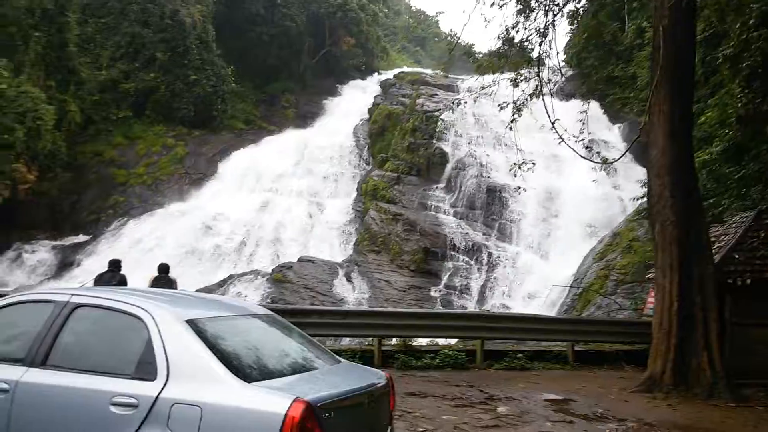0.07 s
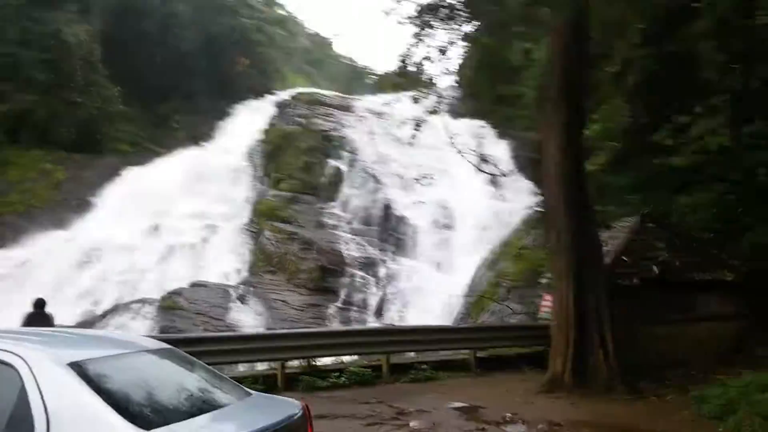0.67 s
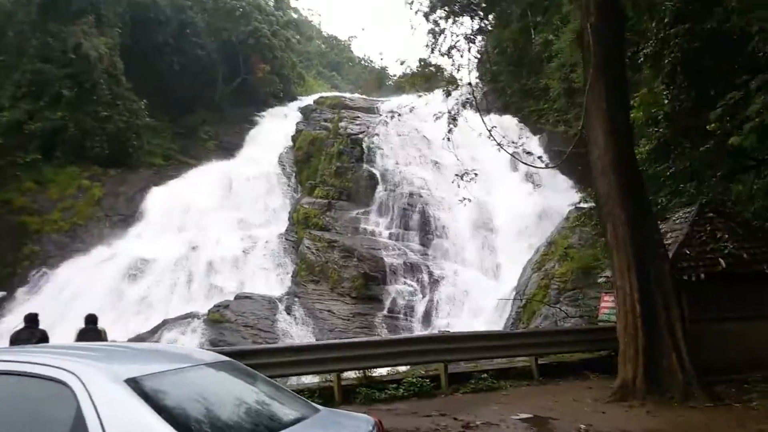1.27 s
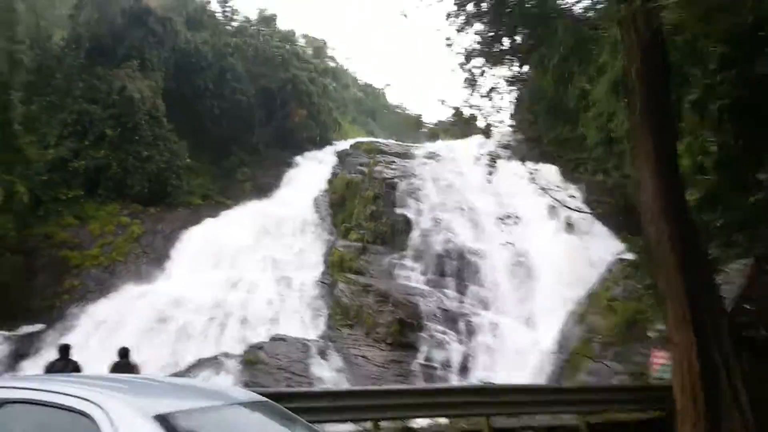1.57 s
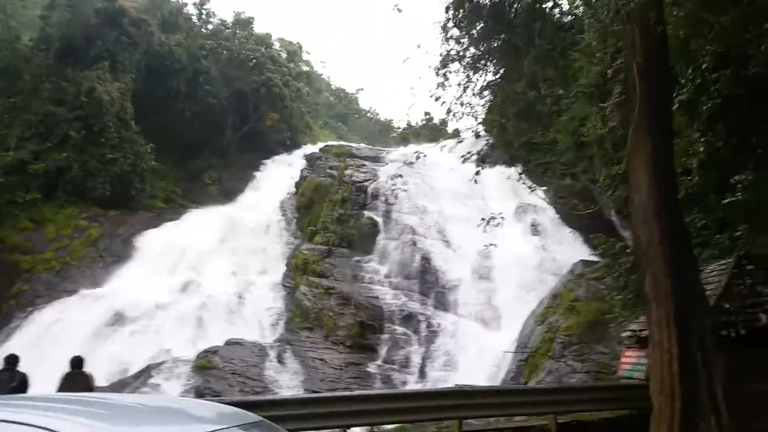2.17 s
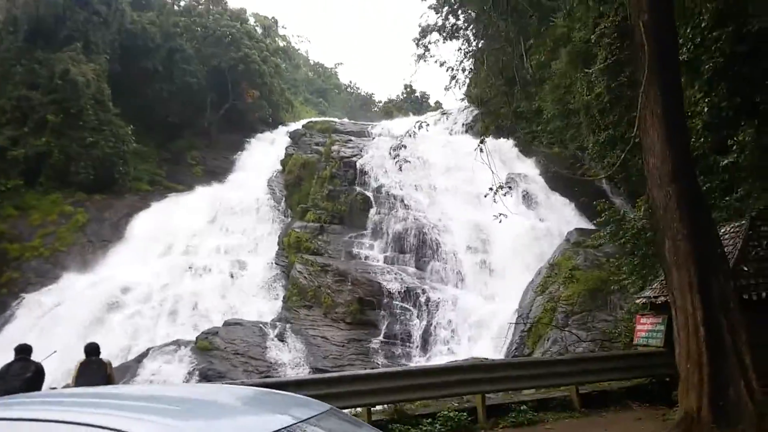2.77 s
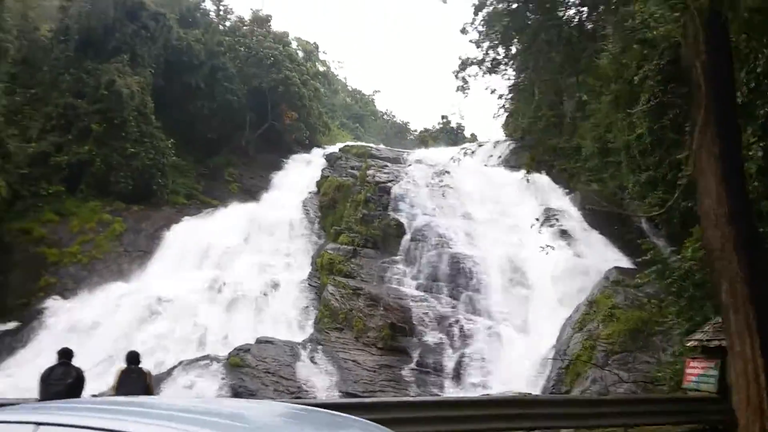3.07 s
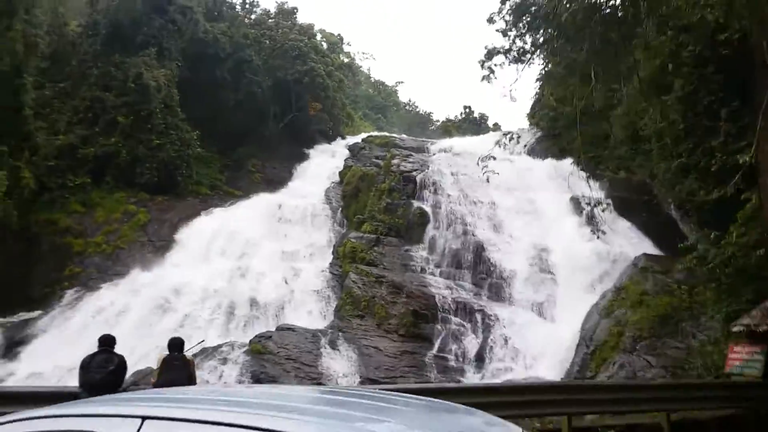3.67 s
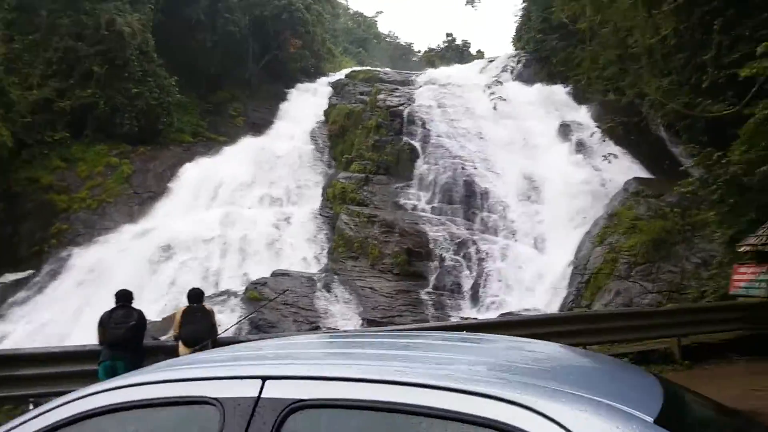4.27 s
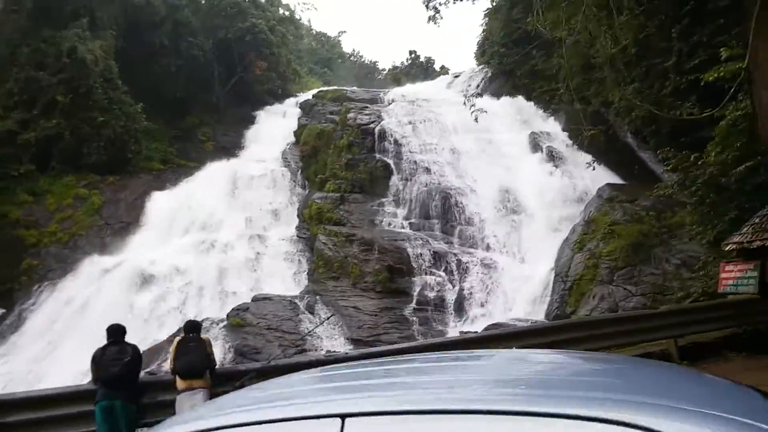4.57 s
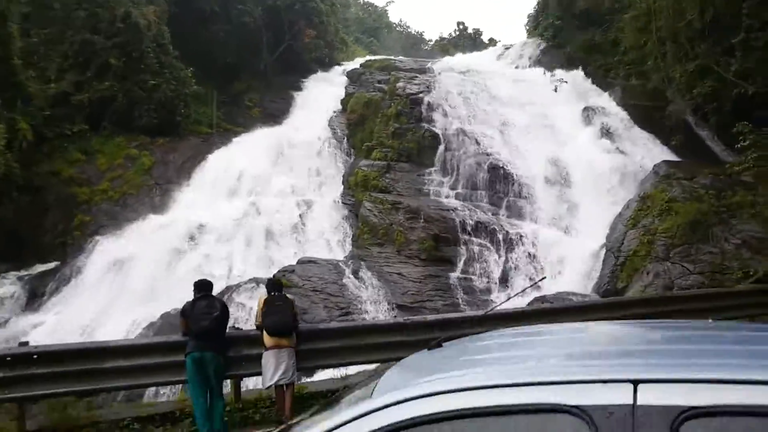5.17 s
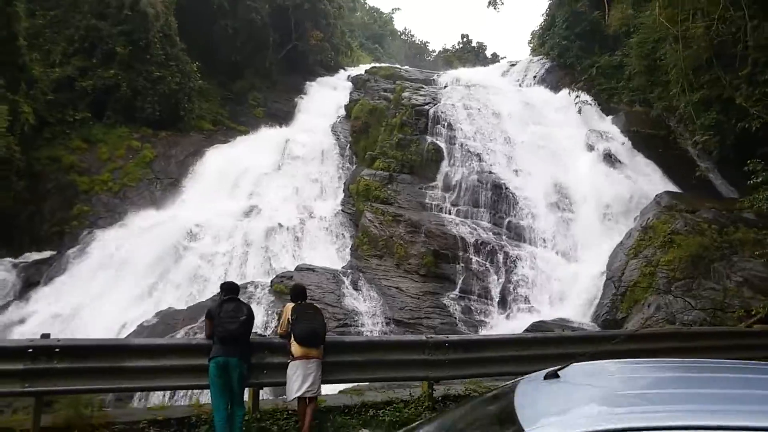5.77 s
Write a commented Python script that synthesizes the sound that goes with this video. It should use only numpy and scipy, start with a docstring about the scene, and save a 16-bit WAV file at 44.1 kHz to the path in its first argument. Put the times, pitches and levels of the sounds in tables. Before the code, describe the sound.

The first half second is silent. Then the roar of a large waterfall fades in, reaching full level just before 1 second. It is a dense, even rush of water pouring over rock, heard from across a wooded gorge, with a full middle range and a bright hiss, the separate drops blurred into one wash. The single microphone is carried along a roadside, so the tone shifts subtly and the hiss grows a little. Two faint, low puffs of wind touch the microphone at about 3.5 and 4 seconds, with a slight swell in the body of the roar between them, and a barely audible breeze remains afterwards. At about 5.3 seconds the whole sound jumps briefly louder and quickly sinks back. The waterfall continues steadily until the end, at around 6 seconds.

```python
"""After half a second of silence, the even roar of a large waterfall fades in across a wooded gorge.
One mono microphone, carried along a roadside among parked cars, hears countless bubbles and drops
merge as the water pours over rock. A reflection off a nearby surface colours the roar and shifts
with the walk. A little wind touches the microphone, and late on the level jumps briefly."""
import sys
import numpy as np
from scipy import signal
from scipy.fft import rfft, irfft
from scipy.io import wavfile
from scipy.ndimage import uniform_filter1d, map_coordinates

SR = 44100
rng = np.random.default_rng(int(sys.argv[2]) if len(sys.argv) > 2 else 0)


def log_audio(samples):
    """Write samples as a 16-bit WAV file to the path given in sys.argv[1]."""
    # one column per channel
    frames = np.atleast_2d(samples).T
    # limit to full scale, then quantise
    limited = np.clip(frames, -1, 1)
    pcm = np.round(limited * 32767).astype(np.int16)
    wavfile.write(sys.argv[1], SR, pcm)


N = 265129
TIME = np.arange(N) / SR
FREQ = np.maximum(np.fft.rfftfreq(N, 1 / SR), 1)


def undb(db):
    """Decibels to gain."""
    return 10 ** (np.asarray(db) / 20)


def unit_rms(x):
    """Scale to rms 1."""
    return x / np.sqrt(np.mean(x ** 2))


def filtered(x, gain):
    """Filter by a gain for each frequency."""
    return irfft(rfft(x) * gain, N)


def lowpass(hz, order):
    """Gain of a low-pass at each frequency."""
    return 1 / np.sqrt(1 + (FREQ / hz) ** (2 * order))


def ease(at_s, length_s):
    """A smooth passage from 0 to 1 centred on a moment."""
    return .5 + .5 * np.sin(np.pi * np.clip((TIME - at_s) / length_s, -.5, .5))


def bump(at_s, sigma_s):
    """A bell curve that reaches 1 at a moment."""
    return np.exp(-.5 * ((TIME - at_s) / sigma_s) ** 2)


def waver(per_s):
    """Random levels held 1 / per_s seconds and smoothed twice; spread near 1."""
    hold = max(int(SR / per_s), 1)
    steps = rng.standard_normal(2048)[np.arange(N) // hold % 2048]
    ramps = uniform_filter1d(steps, hold, mode="constant")
    return np.sqrt(2) * uniform_filter1d(ramps, hold, mode="constant")


def eddies(top_hz):
    """Air eddying right on the microphone: a rumble about two octaves wide."""
    band = lowpass(top_hz, order=3) * (1 - lowpass(top_hz / 4, order=2))
    return unit_rms(filtered(rng.standard_normal(N), band))


# Puffs of wind on the microphone: (time [s], half-width [s], level [dB], top frequency [Hz])
WIND_PUFFS = [(3.492, 0.03, -41, 150), (4.005, 0.05, -45.5, 75)]

def wind(calm_db=-75, breeze_db=-64, gust_db=7.0):
    """Calm air at the microphone freshens to a light, uneven breeze, with two stronger puffs."""
    level_db = calm_db + (breeze_db - calm_db) * ease(at_s=3.8, length_s=.4)
    breeze = eddies(top_hz=65) * undb(level_db + gust_db * waver(per_s=14))
    puffs = sum(eddies(hz) * undb(db) * bump(at_s, sigma_s) for at_s, sigma_s, db, hz in WIND_PUFFS)
    return breeze + puffs


# Spots along the roadside, each with its nearest surface: (time [s], echo lag [ms], echo level [dB])
ROADSIDE_SPOTS = [(0, 0.303, -12), (1.7, 0.28, -14), (4.35, 0.26, -14)]

def near_reflection(sound, treble_hz=2900, move_s=.5):
    """A small surface near the microphone returns the treble and combs it; the comb shifts with the walk."""
    spots = np.array(ROADSIDE_SPOTS)
    moves = sum(np.outer(new[1:] - old[1:], ease(new[0], move_s)) for old, new in zip(spots, spots[1:]))
    lag_ms, echo_db = spots[0, 1:, None] + moves
    treble = filtered(sound, 1 - lowpass(treble_hz, order=4))
    echo = map_coordinates(treble, [np.arange(N) - lag_ms * SR / 1000], order=3, mode="nearest")
    return sound + undb(echo_db) * echo


# Peaks and dips heard along the roadside: (start [s], end [s], centre [Hz], width [Hz], gain [dB])
ROADSIDE_COLOURS = [(0, 3.5, 555, 90, 2.6), (0, 1.8, 3500, 550, 1.1), (0, 1.65, 6100, 800, 1.3),
                    (2.6, 4.3, 5650, 1400, -1.2), (3.7, 6.5, 3050, 700, -2), (4.2, 6.5, 1750, 500, 0.8),
                    (4.35, 6.5, 10200, 470, -11)]

def roadside_colour(sound, fade_s=.66):
    """Resonances and dips in the rush come and go as the microphone is carried along."""
    for start_s, end_s, hz, width_hz, db in ROADSIDE_COLOURS:
        presence = ease(start_s, fade_s) - ease(end_s, fade_s)
        resonance = 1 / (1 + 1j * (FREQ - hz ** 2 / FREQ) / width_hz)
        sound = sound + (undb(db) - 1) * filtered(sound, resonance) * presence
    return sound


def splashes(per_s, spread_db):
    """Drops strike in a dense rain of impacts of uneven size."""
    hits = rng.random(N) < per_s / SR
    return unit_rms(hits * rng.choice([-1, 1], N) * undb(spread_db * rng.uniform(-0.88, 1, N)))


# Spectrum of the falls from across the gorge: (frequency [Hz], relative level [dB])
ROAR_SPECTRUM = [(25, -42), (60, -20), (85, -13), (125, -10.5), (205, -3.5), (310, -1.7), (420, -2.5),
                 (610, -0.1), (750, -2), (1000, -2), (1400, -0.84), (1820, -1.8), (2350, -5.5), (2700, -6),
                 (2920, -6.5), (3300, -3.5), (3700, -2.5), (4300, -4), (5400, -5.5), (6800, -9.5),
                 (8400, -14.5), (9300, -15.5), (11600, -19.5), (14000, -34)]

def waterfall(level_db=-22.5, roar_db_per_s=-0.1034, spray_db_per_s=.41, spray_hz=3000):
    """Impacts ring bubbles of every size; sheets of falling water make them swell and flicker."""
    # most impacts blur into a wash on their way across the gorge
    impacts = rng.standard_normal(N) + undb(-8) * splashes(per_s=3500, spread_db=6)
    hz, db = np.transpose(ROAR_SPECTRUM)
    spectrum = rfft(impacts) * undb(np.interp(np.log(FREQ), np.log(hz), db))
    # so much water hardly wavers: the whole fall, its plunge at the foot, its spray on the rock
    surge_db = .14 * waver(per_s=10)
    plunge_db = .16 * waver(per_s=14)
    spray_db = .16 * waver(per_s=14)
    swell_db = 1.6 * bump(at_s=3.78, sigma_s=.18)  # one slow swell below the hiss
    hiss_db = spray_db_per_s * (TIME - TIME.mean())  # the hiss grows as the listener walks on
    roar = 0
    for centre_hz in 20 * 2 ** np.arange(0, 10, .5):  # one size of bubble every half octave
        bubbles = irfft(spectrum * np.maximum(1 - 2 * np.abs(np.log2(FREQ / centre_hz)), 0), N)
        # big bubbles follow the plunge, small ones the spray
        spray_share = 1 / (1 + (spray_hz / centre_hz) ** 2)
        sheet_db = np.sqrt(1 - spray_share) * plunge_db + np.sqrt(spray_share) * spray_db
        flicker_db = .4 * waver(per_s=18)
        drift_db = spray_share * hiss_db + (1 - spray_share) * swell_db
        roar = roar + bubbles * undb(surge_db + sheet_db + flicker_db + drift_db)
    return unit_rms(roar) * undb(level_db + roar_db_per_s * TIME)


def scene():
    """The falls as they reach the roadside, and wind on the microphone, alike in both channels."""
    mono = roadside_colour(near_reflection(waterfall())) + wind()
    return np.array([mono, mono])


def record(dry, fade_at_s=.508, fade_s=.34, jump_at_s=5.273, rise_s=.009, decay_s=.095, top_hz=14400):
    """The sound fades in; once the level jumps about 5 dB and sinks back; the highest treble is cut."""
    fade = (TIME >= fade_at_s) * np.clip(.06 + (TIME - fade_at_s) / fade_s, 0, 1)
    since_s = np.maximum(TIME - jump_at_s, 0)
    jump_db = 6.9 * (1 - np.exp(-since_s / rise_s)) * np.exp(-since_s / decay_s)
    treble_cut = signal.ellip(10, .1, 80, top_hz, fs=SR, output="sos")
    return signal.sosfilt(treble_cut, dry * fade * undb(jump_db))


dry = scene()
out = record(dry)
log_audio(out)
```